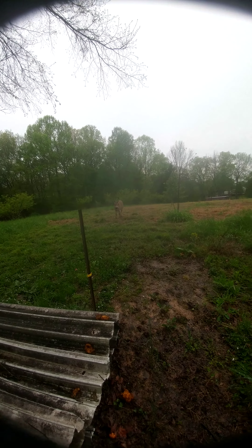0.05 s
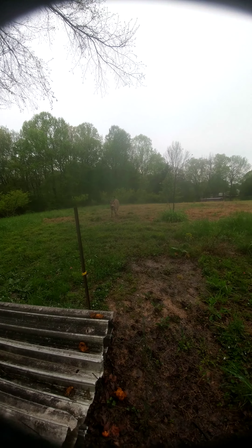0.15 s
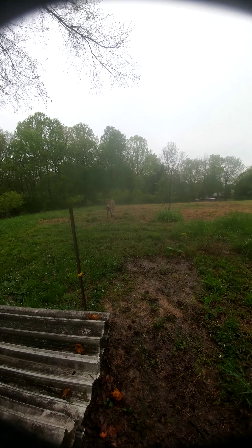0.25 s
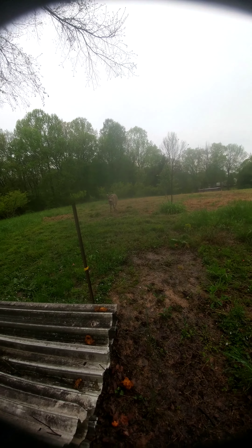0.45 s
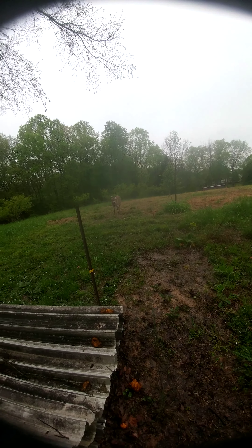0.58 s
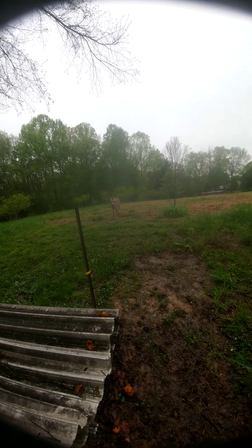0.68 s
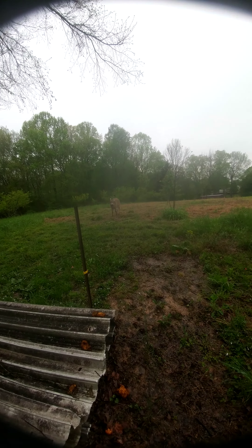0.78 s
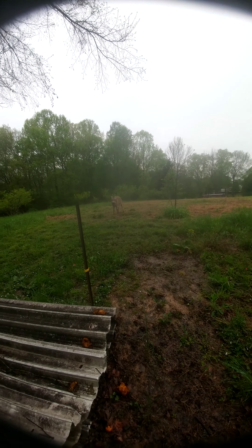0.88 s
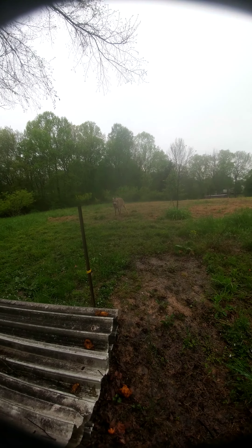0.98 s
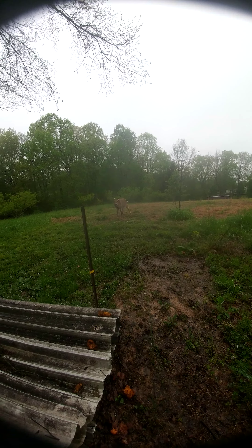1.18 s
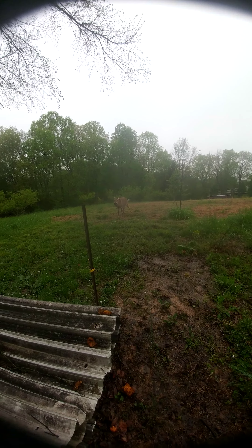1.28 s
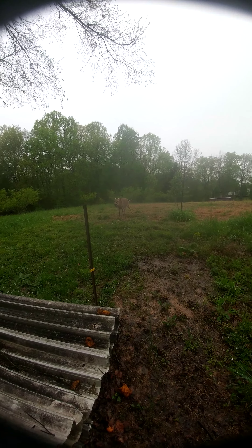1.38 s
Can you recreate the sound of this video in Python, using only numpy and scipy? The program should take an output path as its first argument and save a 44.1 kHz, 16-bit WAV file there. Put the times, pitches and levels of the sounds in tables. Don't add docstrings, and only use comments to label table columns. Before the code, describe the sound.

A donkey works up to a bray, close in an open field. A breath tail and small tick open, then a hoarse, rattling grunt from 0.15 to 0.45 seconds. Air wheezes in until 0.72; a shorter, weaker, broken grunt follows to 0.95. A whistling, gulping in-breath with a wet smack at 1.02 fades by 1.3. Rustles, clicks and dull knocks near the microphone finish over quiet air and low drone.

```python
import sys
import numpy as np
from scipy import signal
from scipy.fft import rfft, irfft
from scipy.io import wavfile
from scipy.ndimage import uniform_filter1d

SR = 44100
rng = np.random.default_rng(int(sys.argv[2]) if len(sys.argv) > 2 else 0)


def file_out(sig):
    cols = np.atleast_2d(sig).T
    lim = np.clip(cols, -1, 1)
    pcm = np.round(lim * 32767).astype(np.int16)
    wavfile.write(sys.argv[1], SR, pcm)


def natural_amplitude(level_db):
    exponent = np.asarray(level_db, float) / 20
    return 10 ** exponent


N = 63945
T = np.arange(N) / SR
HZ = np.fft.rfftfreq(N, 1 / SR)

# frequency in Hz, likeness from 0 to 1.
FIELD_LIKENESS = [(240, 0.99), (950, 0.2), (3800, 0.33)]
# frequency in Hz, left minus right in dB.
NEAR_BALANCE = [(300, 1), (3800, -3), (12000, -1.5)]


def evened(x):
    return x / np.sqrt(np.mean(x ** 2) + 1e-20)


def read(points, hz):
    f, value = np.transpose(points)
    return np.interp(np.log(hz + 1), np.log(f + 1), value)


def shaped(x, points):
    return irfft(rfft(x) * natural_amplitude(read(points, HZ)), N)


def coloured(points):
    return evened(shaped(rng.standard_normal(N), points))


def flow(tables):
    return sum(natural_amplitude(np.interp(T, *np.transpose(rows), left=-200, right=-200)) for rows in tables)


def resonate(x, hz, width):
    turn = np.exp(2j * np.pi * np.cumsum(hz * np.ones(len(x))) / SR)
    r = np.exp(-np.pi * width / SR)
    return 2 * (turn * signal.lfilter([1 - r], [1, -r], x / turn)).real


def butter(x, order, hz, kind):
    return signal.sosfiltfilt(signal.butter(order, hz, kind, fs=SR, output="sos"), x)


def folds(flaps):
    jitter_s, shimmer_db, single_s = .00045, .8, .016
    s, db, fall_db = np.transpose(flaps)
    gap = np.diff(s)[:, None]
    third = np.arange(3)
    dropped = (gap < single_s) & (third > 0)
    luck = rng.standard_normal((len(s) - 1, 3, 2))
    at = s[:-1, None] + gap * third / 3 + jitter_s * luck[..., 0] * (third > 0)
    level_db = db[:-1, None] - fall_db[:-1, None] * third + shimmer_db * luck[..., 1]
    train = np.zeros(N)
    train[np.round(at * SR).astype(int)] = natural_amplitude(level_db) * ~dropped
    return train


def ring(throat):
    ring_s, rise_s, soft_s = .0076, .0024, .0007
    t = np.arange(round(ring_s * SR)) / SR
    modes = np.array([natural_amplitude(db) * np.exp(-np.pi * width * t) * np.cos(2 * np.pi * hz * (t - soft_s))
                      for hz, width, db in throat])
    rise = np.sin(np.pi / 2 * np.minimum(t / rise_s, 1))
    damping = np.cos(np.pi / 2 * (t / ring_s) ** 2)
    modes = modes * rise * damping
    return np.array([modes[:2].sum(0), modes[2:].sum(0)]) / abs(modes.sum(0)).max()


def out_breath(beat):
    # time in seconds, level in dB.
    out_flow = [
        [(.15, -52.5), (.175, -38.5), (.21, -28.5), (.31, -31), (.36, -43), (.385, -58), (.44, -55)],
        [(.725, -51), (.75, -33), (.79, -25.5), (.83, -28), (.89, -38), (.915, -51), (.97, -46)],
    ]
    # frequency in Hz, density in dB per Hz.
    out_air = [(88, -48), (150, 1), (346, 3.5), (550, -4.5), (827, 5), (1660, -23.5), (3980, -29),
               (10300, -46.5), (15500, -78)]
    # frequency in Hz, width in Hz, level in dB.
    out_pipe = [(2450, 300, 0), (3950, 300, -1), (950, 500, -3)]
    pulsed, low_pulsed = 0.18, .6
    white = rng.standard_normal(N)
    pipe = sum(natural_amplitude(db) * evened(resonate(white, hz, width)) for hz, width, db in out_pipe)
    lift_db = np.clip(np.log2(HZ / 900 + 1e-9), 0, 1) * 13
    wide = evened(irfft(rfft(coloured(out_air)) * natural_amplitude(lift_db), N))
    air = evened(natural_amplitude(-9.5) * pipe + wide)
    low = butter(air, 2, 1500, "low")
    high = (air - low) * (1 - pulsed + pulsed * beat)
    low = natural_amplitude(-3) * low * (1 - low_pulsed + low_pulsed * beat)
    return natural_amplitude(7.0) * (high + low) * flow(out_flow)


def grunts():
    # start in seconds, level in dB, fall per fold pulse in dB.
    flap_rows = [
        [(.184, -24, -6), (.2078, -6.5, 2), (.2368, -2.5, 3.5), (.2652, -5.5, 0), (.2912, -3, 2.5),
         (.3165, -2.5, 3), (.342, -11, 1.5), (.3675, -17, 4), (.393, -21, 1), (.418, -26, 2), (.444, -33, 2),
         (.47, -40, 0)],
        [(.752, -30, -4), (.778, -12, 4), (.8072, -10.5, 0), (.8183, -9, 11), (.842, -21, 0), (.8505, -14, 8),
         (.8765, -26, 0), (.9, -30, 1), (.928, -32, 3), (.953, -40, 0)],
    ]
    # frequency in Hz, width in Hz, level in dB.
    throats = [
        [(372, 82, 5.5), (218, 27, -29), (836, 100, 8.5), (1119, 62, 1), (1310, 132, -6.5)],
        [(292, 170, -2.5), (172, 140, -9), (817, 74, -7.5), (1120, 130, -5.5), (1370, 78, -20)],
    ]
    rasp_db, rasp_s = -12, .004
    brighten = 1.35
    voice, beat = np.zeros(N), np.zeros(N)
    puff = np.exp(-np.arange(800) / (rasp_s * SR))
    for flaps, throat in zip(flap_rows, throats):
        train = folds(flaps)
        gate = signal.oaconvolve(train, puff)[:N]
        effort = (np.minimum(gate / train.max(), 1) + 1e-6) ** (brighten - 1)
        rasp = natural_amplitude(rasp_db) * gate * rng.standard_normal(N) / np.linalg.norm(puff)
        drive = train + rasp
        low_and_upper = np.array([drive, drive * effort])
        voice += natural_amplitude(2.5) * signal.oaconvolve(low_and_upper, ring(throat), axes=1)[:, :N].sum(0)
        beat += gate
    beat = beat / (abs(uniform_filter1d(beat, 1200)) + 0.001)
    return butter(voice, 3, [165, 2000], "band") + out_breath(beat)


def wheezes():
    # time in seconds, level in dB.
    in_flow = [
        [(0, -32), (.06, -37), (.115, -44), (.16, -73)],
        [(.445, -48), (.458, -37), (.49, -24), (.52, -28), (.535, -31), (.672, -34.5), (.685, -37.5),
         (.725, -58)],
        [(.945, -59), (.98, -35.5), (1.01, -28), (1.07, -30), (1.14, -39.5), (1.2, -42), (1.33, -62)],
    ]
    # frequency in Hz, density in dB per Hz.
    in_air = [(200, -13), (1100, 0.5), (1300, -9), (2650, -10), (4700, -6.5), (5000, -14), (10000, -24.5),
              (15500, -29)]
    # frequency in Hz, width in Hz, level in dB.
    nose_modes = [(1050, 190, -8), (2380, 90, -5), (3050, 150, -11), (3710, 110, -3), (4010, 100, -1),
                  (4320, 110, -2), (4690, 100, 4), (5520, 80, 1)]
    # frequency in Hz, gain in dB.
    sinus = [(4800, 0), (4900, -12), (5300, -14), (5900, -6)]
    # time in seconds, resonance shift as a ratio, narrowness in dB, throat in dB.
    flare = [(0, .97, -7, 0), (.3, 1, -7, 0), (.44, 1, 0, 0), (.93, 1, 0, 0), (.95, .86, 0, -5),
             (1.01, 1, 0, -5), (1.1, .99, -1, -5), (1.2, .93, -9, -4)]
    waver, waver_hz = .006, 11.0
    flutter_db, flutter_hz = 1.2, 147
    s, shift, narrow_db, throat_db = np.transpose(flare)
    pinch = np.interp(T, s, shift) + waver * evened(resonate(rng.standard_normal(N), 0, waver_hz))
    white = rng.standard_normal(N)
    nose = np.zeros(N)
    for hz, width, db in nose_modes:
        once = resonate(white, hz * pinch, width)
        nose += natural_amplitude(db) * resonate(once, hz * pinch, 3 * width)
    narrow = evened(shaped(nose, sinus)) * natural_amplitude(np.interp(T, s, narrow_db))
    air = evened(narrow + natural_amplitude(-3.5) * coloured(in_air))
    low = butter(air, 2, 1400, "low")
    air = air + (natural_amplitude(np.interp(T, s, throat_db)) - 1) * low
    flutter = evened(resonate(rng.standard_normal(N), 0, flutter_hz))
    return natural_amplitude(-2.0) * air * natural_amplitude(flutter_db * flutter) * flow(in_flow)


def whistles():
    # start in seconds, length in seconds, level in dB, from Hz, to Hz.
    glides = [(.956, .028, -34, 2950, 3200), (.978, .04, -33, 3300, 4550), (1.026, .025, -28, 1100, 850),
              (1.012, .014, -28, 1750, 1700), (1.022, .022, -32, 1800, 2050), (1.05, .01, -33, 830, 780),
              (1.03, .018, -31, 4600, 4600), (1.054, .012, -28, 4200, 4500), (1.068, .021, -32, 700, 800),
              (1.105, .019, -33, 760, 720), (1.068, .016, -33, 380, 480), (1.092, .02, -38, 1700, 1750),
              (1.118, .02, -37, 4500, 4450), (1.147, .006, -34, 850, 800), (1.148, .012, -36, 350, 600),
              (1.11, .11, -50, 3650, 3620), (1.24, .09, -59, 3650, 3600), (1.17, .08, -53, 2400, 2400),
              (1.07, .014, -38, 170, 250), (.5, .02, -34, 1120, 1100), (.663, .016, -34, 3950, 3950),
              (1.1, .025, -44, 170, 160), (.56, .02, -37, 450, 430)]
    out = np.zeros(N)
    for s, length, db, from_hz, to_hz in glides:
        u = np.clip((T - s) / length, 0, 1)
        hz = from_hz + (to_hz - from_hz) * u
        tone = np.sin(2 * np.pi * np.cumsum(hz) / SR)
        fuzz = evened(resonate(rng.standard_normal(N), hz, 120))
        out += natural_amplitude(db) * np.sin(np.pi * u) * (tone + .3 * fuzz)
    return out


def smack():
    # frequency in Hz, level in dB, time to fall 60 dB in seconds.
    cavities = [(4720, 6, 0.0056), (890, 0, 0.005), (6100, -0.5, 0.0063), (8000, 10, 0.0016),
                (9700, 2, 0.0016), (14800, -25, 0.002), (1630, -4, 0.0048)]
    t = np.maximum(T - 1.0166, 0)
    rings = sum(natural_amplitude(db - 60 * t / t60) * np.sin(2 * np.pi * hz * t) for hz, db, t60 in cavities)
    return natural_amplitude(-8) * np.minimum(t / 0.00032, 1) * rings


def echo(x):
    t60_s, first_s, dull_hz = .2, .012, 1500
    t = T[:SR // 2]
    taps = rng.standard_normal((2, len(t))) * natural_amplitude(-60 * t / t60_s) * (t > first_s)
    both = taps + 1.53 * taps[::-1]
    taps = signal.lfilter([1], [1, -np.exp(-2 * np.pi * dull_hz / SR)], both)
    return natural_amplitude(-19) * signal.fftconvolve(x[None], taps / np.linalg.norm(taps[0]), axes=1)[:, :N]


def rustles():
    # start in seconds, peak in dB, time to fall 60 dB in seconds.
    bursts = [
        (0.015, -35.5, 0.037),
        (1.135, -37, 0.17),
        (1.357, -41.5, 0.18),
        (1.361, -36, 0.067),
        (1.389, -41, 0.2),
        (1.4146, -33.5, 0.079),
        (1.43, -40, 0.15),
        (1.444, -35, 0.019),
    ]
    # frequency in Hz, density in dB per Hz.
    rub = [(100, -23), (500, 4), (800, 4), (1200, -12), (7800, -14), (15700, -36.5)]
    bump_s, bump_db, bump_hz = 1.4452, -18, 290
    shape = sum((T > s) * natural_amplitude(db - 60 * abs(T - s) / t60) for s, db, t60 in bursts)
    crackle = natural_amplitude(3.6 * rng.standard_normal(N // 40 + 1).repeat(40)[:N])
    u = np.clip((T - bump_s) * bump_hz, 0, 1)
    bump = natural_amplitude(bump_db) * np.sin(2 * np.pi * u) * (1 - 0.54 * u)
    return shape * crackle * coloured(rub) + bump


def ticks():
    # start in seconds, peak in dB, centre in Hz.
    snaps = [(0.0137, -30.5, 5800), (.14, -40, 7000), (0.407, -52, 8000), (.4262, -50, 7000),
             (.7125, -45, 10000), (1.14, -40, 13500), (1.3408, -41, 10000), (1.357, -38, 9500),
             (1.3618, -23.5, 8000), (1.3658, -32.5, 5600), (1.3876, -35, 7500), (1.416, -37, 8000)]
    # start in seconds, peak in dB, frequency in Hz, time to fall 60 dB in seconds.
    knocks = [(1.3562, -39, 710, 0.011), (1.3615, -40, 940, 0.023), (1.367, -50, 643, 0.024),
              (1.3845, -43, 584, .05), (1.393, -47, 616, .04), (1.4168, -25, 720, 0.017),
              (1.4187, -24, 564, 0.018), (1.4318, -31, 520, 0.018), (1.4443, -26, 970, 0.0056)]
    decay_s, q = .0009, 2.5
    out = np.zeros(N)
    for s, db, hz in snaps:
        burst = rng.standard_normal(200) * np.exp(-np.arange(200) / SR / decay_s)
        snap = resonate(resonate(burst, hz, hz / q), hz, hz / q)
        out[round(s * SR):][:200] += natural_amplitude(db) * snap / abs(snap).max()
    for s, db, hz, t60 in knocks:
        t = np.maximum(T - s, 0)
        out += natural_amplitude(db - 60 * t / t60) * np.sin(2 * np.pi * hz * t)
    return out


def ports(x, same, tilt, size=256):
    # frequency in Hz, lead of the left in radians.
    lead = [(0, 0), (6290, 3), (15300, 5)]
    drift_rad = 1.8
    frames = signal.stft(x, nperseg=size)[2]
    drift = uniform_filter1d(rng.standard_normal(frames.shape[::-1]), size=32, axis=0)
    drift = evened(uniform_filter1d(drift, size=8, axis=1))
    other = signal.istft(frames * np.exp(1j * drift_rad * drift.T), nperseg=size)[1][:N]
    other = rfft(evened(other) * np.sqrt(np.mean(x ** 2)))
    z = rfft(x)
    c = np.clip(read(same, HZ), 0, 1)
    db = read(tilt, HZ)
    turn = np.interp(HZ, *np.transpose(lead))
    left = z * natural_amplitude(db / 2) * np.exp(1j * turn / 2)
    right = (c * z + np.sqrt(1 - c ** 2) * other) * natural_amplitude(-db / 2) * np.exp(-1j * turn / 2)
    total = abs(natural_amplitude(db / 2) * np.exp(1j * turn) + natural_amplitude(-db / 2))
    return irfft(np.array([left, right]) * 2 / np.maximum(total, 1), N)


def field():
    # frequency in Hz, density in dB per Hz.
    still_air = [(25, -4.5), (96, -0.5), (250, -23.5), (750, -6), (1300, -13), (4000, -26.5),
                 (11500, -33.5), (12600, -37)]
    swell = evened(resonate(rng.standard_normal(N), 0, 8.1))
    air = natural_amplitude(-47 + 3.7 * swell) * coloured(still_air)
    drone = natural_amplitude(-55.5) * evened(resonate(rng.standard_normal(N), 96.3, 4.3))
    return ports(air + drone, FIELD_LIKENESS, NEAR_BALANCE)


def scene():
    # frequency in Hz, gain in dB.
    mic = [(8300, 1.5), (9000, -6.5), (9700, 5), (11600, -0.5), (12300, -27), (15700, -18)]
    # frequency in Hz, likeness from 0 to 1.
    likeness = [(60, .995), (1500, .97), (4500, .86), (8000, .55), (13000, .55)]
    # frequency in Hz, left minus right in dB.
    balance = [(250, -0.5), (640, 4.5), (1400, -0.5), (4500, -6.5), (9000, 3), (13000, 14.5)]
    donkey = shaped(grunts() + wheezes() + whistles(), mic)
    lips = smack()
    animal = ports(donkey, likeness, balance) + ports(lips, likeness, balance, size=32)
    near = ports(rustles(), FIELD_LIKENESS, NEAR_BALANCE) + ports(ticks(), likeness, NEAR_BALANCE, size=32)
    return animal + echo(donkey + lips) + near + field()


def top_cut(x):
    return signal.sosfilt(signal.butter(12, 15740, fs=SR, output="sos"), x)


def record(dry):
    heard = signal.sosfilt(signal.butter(3, 55, "high", fs=SR, output="sos"), dry)
    limited = 1.47 * np.tanh(heard / 1.747)
    return top_cut(limited)


dry = scene()
out = record(dry)
file_out(out)
```